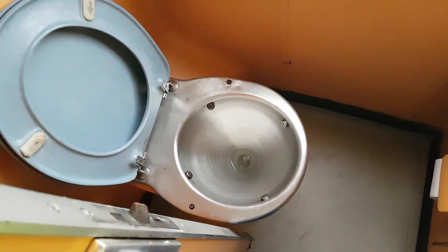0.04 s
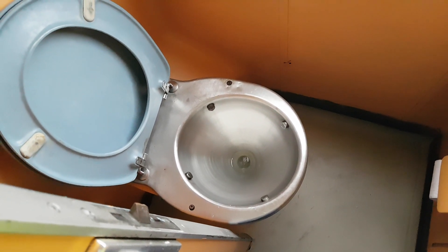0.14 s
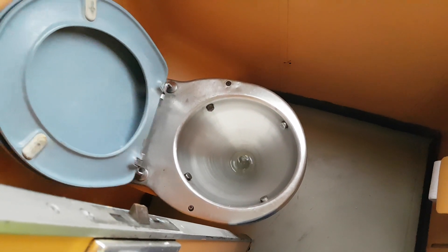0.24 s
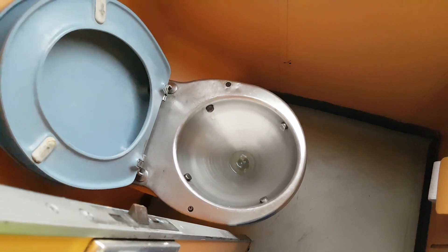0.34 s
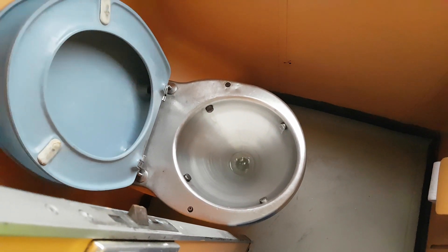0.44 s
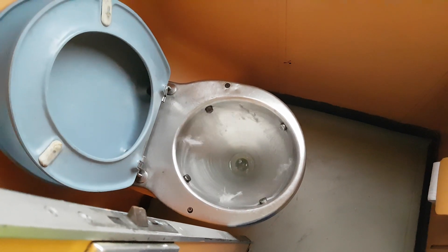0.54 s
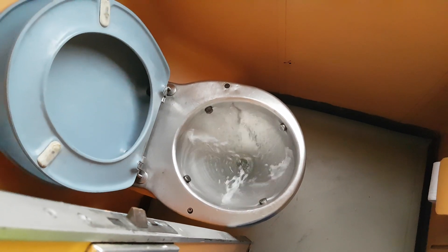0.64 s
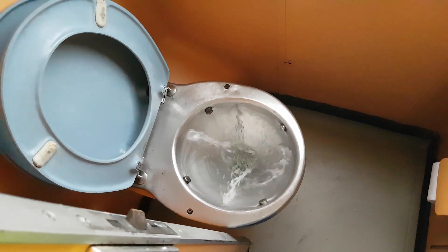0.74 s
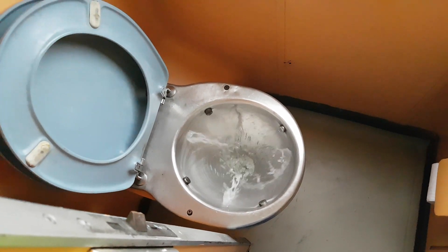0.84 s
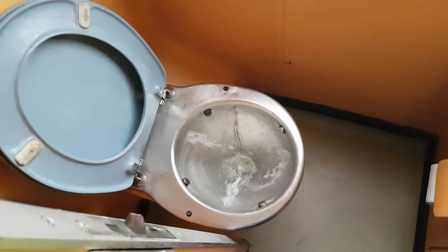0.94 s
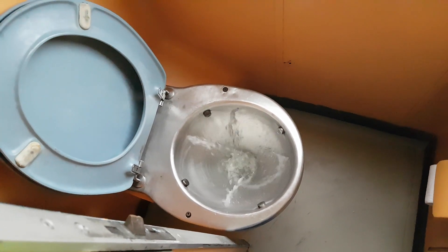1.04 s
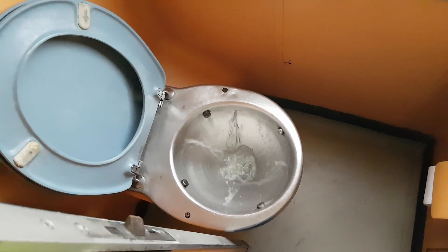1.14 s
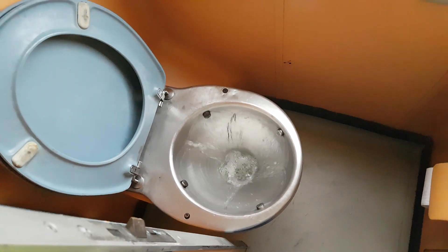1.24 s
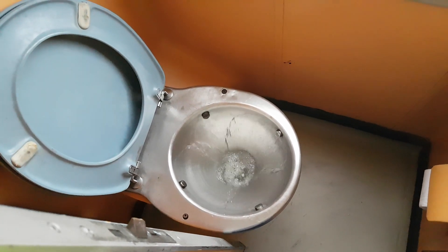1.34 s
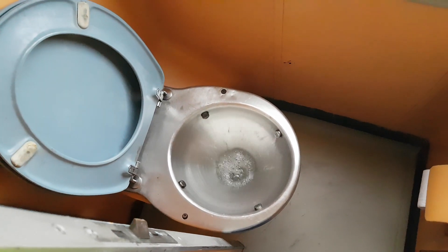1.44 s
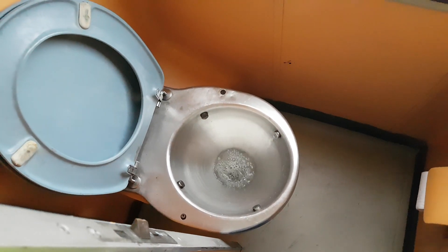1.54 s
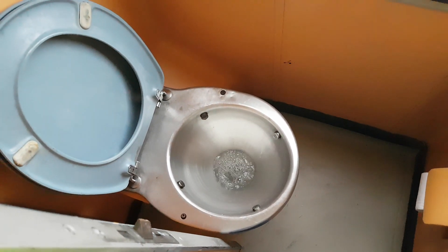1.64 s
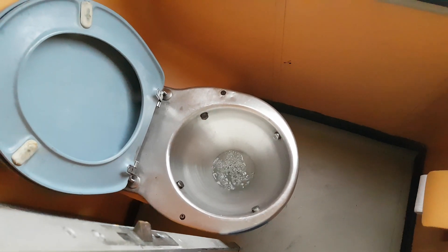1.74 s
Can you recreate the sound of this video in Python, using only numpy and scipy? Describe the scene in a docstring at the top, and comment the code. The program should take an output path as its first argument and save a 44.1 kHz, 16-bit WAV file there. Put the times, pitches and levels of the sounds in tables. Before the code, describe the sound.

Vacuum toilet flush in a small train washroom, with loud suction bursts, bowl knocks and hissing water jets

```python
"""In the small washroom of a train carriage, a vacuum toilet flushes over a steady ventilation hiss.
An air valve spits, then slugs of air and water rattle the drain pipe, knock the bowl and clack the flap.
Rinse jets spray the steel bowl and die away while the drain gulps and rumbles.
Air and spray are filtered noise with water drops as random clicks; knocks and the big gulp are sine waves.
Hard walls add a short echo tail, and two microphones hear it in stereo."""
import sys
import numpy as np
from scipy import signal
from scipy.fft import rfft, irfft
from scipy.io import wavfile
from scipy.ndimage import uniform_filter1d, minimum_filter1d

SR = 44100
rng = np.random.default_rng(int(sys.argv[2]) if len(sys.argv) > 2 else 0)


def wav_out(sig):
    """Save sig, one row per channel (or a flat mono array), as 16-bit PCM at SR to the path in sys.argv[1]."""
    wavfile.write(sys.argv[1], SR, np.round(np.clip(np.atleast_2d(sig).T, -1, 1) * 32767).astype(np.int16))


N = 77175  # length [samples]

TIME = np.arange(N) / SR  # [s]
TAPS = 8192  # filter length [samples]
HZ = np.fft.rfftfreq(TAPS, 1 / SR)  # frequencies at which filters are drawn


def amp(db):
    """Turns decibels into a plain multiplier."""
    return 10 ** (np.asarray(db) / 20)


def evened(x):
    """Scales a signal to an average strength (rms) of 1."""
    return x / np.sqrt(np.mean(x ** 2) + 1e-20)


def read(points, hz=HZ):
    """Reads between the points of a frequency table, on a log-frequency axis."""
    table_hz, value = np.transpose(points)
    return np.interp(np.log(hz + 1), np.log(table_hz + 1), value)


def rings(table):
    """Gain of resonances: each lifts the power around its frequency above a flat base."""
    lifts = sum((amp(db) ** 2 - 1) / (1 + (2 * (HZ - hz) / width) ** 2) for hz, width, db in table)
    return np.sqrt(1 + lifts.clip(-.5))


def unit(gain):
    """Scales a filter so that white noise keeps its level."""
    return gain / np.sqrt(np.mean(gain ** 2))


def colour(x, gain):
    """Gives a sound the wanted gain at each frequency, with no ringing before the sound."""
    cepstrum = irfft(np.log(np.maximum(gain, 1e-5)))
    # folding the second half onto the first makes the filter respond as early as it can
    cepstrum[1:TAPS // 2] *= 2
    cepstrum[TAPS // 2 + 1:] = 0
    response = irfft(np.exp(rfft(cepstrum)))
    return signal.fftconvolve(x, np.atleast_2d(response), axes=1)[:, :N]


def lean(x, table):
    """Tips each frequency to the left or right by making one side louder and the other softer."""
    db = read(table, np.fft.rfftfreq(2 * N, 1 / SR))
    return irfft(rfft(x, 2 * N) * amp([db / 2, -db / 2]))[:, :N]


# how alike the two channels are: (frequency [Hz], left-right correlation [-1 to 1])
CHANNEL_LIKENESS = [(30, .99), (130, 0.89), (300, 0.91), (550, 0.79), (1000, 0.44), (2000, 0.25),
                    (4000, 0.1), (12000, 0.051)]


def pair(x):
    """Blends two unrelated signals so that the bass is alike in both channels and the treble is not."""
    a, b = rfft(x)
    same = np.clip(read(CHANNEL_LIKENESS, np.fft.rfftfreq(N, 1 / SR)), -1, 1)
    mid = a * np.sqrt((1 + same) / 2)
    side = b * np.sqrt((1 - same) / 2)
    return irfft([mid + side, mid - side], N)


def air():
    """Turbulent air as stereo white noise."""
    return pair(rng.standard_normal((2, N)))


def wet(rate, spread_db, share):
    """Air mixed with water hits: random clicks of uneven size, 'rate' per second on average."""
    size = amp(spread_db * np.minimum(rng.exponential(1, N), 4))
    size = size * (rng.random(N) < rate / SR)
    hits = evened(pair(size * rng.choice([-1., 1.], (2, N))))
    share = np.clip(share, 0, 1)  # part of the power that is hits
    return np.sqrt(share) * hits + np.sqrt(1 - share) * air()


def flutter(rate_hz, depth_db):
    """Random wavering around 1: noise slower than about rate_hz, with an rms swing of depth_db."""
    slow = rfft(rng.standard_normal(N)) / (1 + (np.fft.rfftfreq(N, 1 / SR) / rate_hz) ** 4)
    return amp(depth_db * evened(irfft(slow, N)))


def burst(start, attack, hold, t60):
    """Loudness shape: straight rise, hold, then a fade that drops 60 dB in t60 seconds."""
    t = TIME - start
    fade = np.exp(-np.log(1000) * np.maximum(t - attack - hold, 0) / t60)
    return np.clip(t / attack, 0, 1) * fade


# balance of the carriage hiss: (frequency [Hz], relative level per Hz [dB])
CARRIAGE_TONE = [(25, 2.5), (45, -12), (100, -31), (200, -16.5), (450, -8.5), (700, -8), (950, -2.5),
                 (1400, -17.5), (2000, -6.5), (2700, -14), (3700, -9.5), (4400, -16), (5400, -9.5),
                 (6500, -26), (7600, -16), (9100, -31), (10500, -27.5), (13000, -23.5), (15500, -23)]
# faint resonances in the hiss: (frequency [Hz], width [Hz], lift [dB])
CARRIAGE_RINGS = [(870, 100, 2), (1135, 40, 11.5), (1550, 49, 10), (1960, 61, 6.5)]


def carriage():
    """Steady ventilation hiss: filtered noise with a few faint resonances."""
    level_db = -46
    return amp(level_db) * colour(air(), unit(amp(read(CARRIAGE_TONE)) * rings(CARRIAGE_RINGS)))


# churning of the drain: (time [s], level [dB])
RUMBLE_LEVEL = [(.17, -64), (.24, -43), (.258, -22.5), (.35, -34), (.5, -41.5), (.85, -72), (.94, -46),
                (1.01, -32), (1.13, -29.5), (1.17, -22), (1.23, -21), (1.28, -26.5), (1.35, -39.5),
                (1.45, -30.5), (1.55, -40), (1.75, -40.5)]
# balance of the churning: (frequency [Hz], relative level per Hz [dB])
RUMBLE_TONE = [(20, -11), (36, -11.5), (48, 0), (65, 1.5), (92, 1), (150, -2), (210, -11), (290, 0),
               (450, -12.5), (800, -19.5), (2000, -26.5), (3000, -31), (15000, -67)]
# one heave of the air column: (time [s], attack [s], hold [s], 60 dB fade [s], level [dB], frequency [Hz])
HEAVE = (1.155, .04, .055, .2, -23.5, 48)


def rumble():
    """Water churns as deep noise in the drain, and the air column heaves as a low sine at the main gulp."""
    *shape, db, hz = HEAVE
    heave = amp(db) * burst(*shape) * np.sin(2 * np.pi * hz * (TIME - shape[0]))
    level = amp(np.interp(TIME, *np.transpose(RUMBLE_LEVEL)))
    churn = colour(air() * level, unit(amp(read(RUMBLE_TONE))))
    return heave + churn


# a sharp spit, a duller rush and a late puff:
# (time [s], attack [s], hold [s], 60 dB fade [s], level [dB], extra treble [dB])
PUFFS = [(0.195, 0.0067, 0.034, 0.057, -18.5, 2.5), (0.218, 0.0076, 0.027, 0.3, -19, -8.5),
         (.412, 0.0017, 0.0043, 0.095, -34.5, -2.5)]
# balance of the escaping air: (frequency [Hz], relative level per Hz [dB])
PUFF_TONE = [(40, -12), (250, -5), (600, -0.5), (1200, -0.5), (4000, 3.5), (7400, 3), (9000, -4.5),
             (10500, 0), (12400, 2), (13200, -5), (15500, -11)]
# resonances of the valve: (frequency [Hz], width [Hz], lift [dB])
VALVE_RINGS = [(2600, 39, 5), (13000, 360, 6.5)]


def valve():
    """Compressed air spits from the valve: noise puffs, the first one the sharpest."""
    tone = unit(amp(read(PUFF_TONE)) * rings(VALVE_RINGS))
    top = 1 - 1 / (1 + (HZ / 9900) ** 8)  # the range that the extra treble acts on
    out = np.zeros((2, N))
    for *shape, db, treble_db in PUFFS:
        out += colour(air() * burst(*shape), tone * amp(db + treble_db * top))
    return out


# hisses and whistles:
# (time [s], attack [s], hold [s], 60 dB fade [s], level [dB], frequency [Hz], width [Hz])
WHISTLES = [(0.197, 0.003, 0.01, 0.071, -15.5, 12260, 450),
            (0.202, .008, 0.0072, 0.065, -19.5, 11300, 1000),
            (0.197, 0.003, 0.0051, 0.071, -24.5, 1250, 507), (.274, .005, .016, .08, -13.5, 2000, 380),
            (.274, .005, .045, .10, -20, 2480, 140), (.318, .008, .008, .10, -19, 2060, 180),
            (1.088, 0.019, 0.019, .25, -22, 12300, 3500), (1.108, .02, 0.021, 0.23, -23, 13930, 260),
            (1.129, 0.02, 0.04, .08, -24, 7160, 1100), (1.192, 0.0041, 0.0076, 0.073, -20, 1005, 120),
            (1.393, 0.015, 0.019, 0.24, -36.5, 1983, 50)]


def whistles():
    """Air in narrow gaps of the valve, drain and nozzles: a narrow noise band whistles, a wide one hisses."""
    out = np.zeros((2, N))
    for *shape, db, hz, width in WHISTLES:
        band = unit(1 / (1 + ((HZ - hz) / width * 2) ** 2))
        out += colour(air() * burst(*shape), amp(db) * band)
    return out


# slugs of air and water: (time [s], attack [s], hold [s], 60 dB fade [s], level [dB],
# extra bass [dB], extra treble [dB], nearness to the bowl [0-1])
SLUGS = [(.255, 0.0017, 0.009, 0.36, -15.5, 7.5, -13, 0.23), (.271, 0.002, 0.009, 0.2, -12.5, 2, 0.5, 0.6),
         (.311, 0.0076, 0.0085, 0.25, -12.5, 4, 5, 0), (.413, 0.0009, 0.013, 0.17, -21.5, 8, 3, 0.62),
         (.530, 0.0087, 0.0068, 0.17, -24.5, -10, -2.5, 1),
         (.993, 0.0021, 0.008, 0.19, -18.5, 11.5, -10, 1), (1.055, 0.005, 0.035, 0.33, -27, 8.5, -44, 1),
         (1.200, 0.0013, 0.012, 0.2, -18.5, 9, 5, 0.82), (1.243, 0.0017, 0.015, 0.16, -33, 14, 7.5, 0.7),
         (1.392, 0.017, 0.0069, 0.36, -28, 5, -8.5, .7), (1.640, 0.0037, 0.0062, 0.42, -37.5, -5, -13, 0.4)]
# balance of the pipe: (frequency [Hz], relative level per Hz [dB])
PIPE_TONE = [(30, -18), (100, -11.5), (210, -15.5), (300, -4.5), (450, -2.5), (700, -4.5), (1000, 0),
             (1450, -2), (2000, 1.5), (2900, -2.5), (4100, -3), (5500, -17), (7500, -31.5), (9000, -37),
             (12500, -39), (15500, -38)]
# resonances of the pipe: (frequency [Hz], width [Hz], lift [dB])
PIPE_RINGS = [(323, 25, 11), (482, 15, 8), (544, 18, 8), (1352, 18, 7), (1682, 25, 7), (1840, 35, 6),
              (1963, 20, 9), (2036, 25, 10), (2170, 20, 7), (2470, 35, 11), (2590, 25, 6), (3461, 20, 7),
              (3640, 40, 5)]
# resonances of the bowl, also used by the flap: (frequency [Hz], width [Hz], lift [dB])
BOWL_RINGS = [(352, 20, 6), (455, 30, 8), (808, 20, 10), (885, 20, 6), (1022, 40, 11), (1830, 35, 6),
              (1950, 35, 9)]


def drain():
    """Slugs of air and water rattle through the pipe: far ones ring the pipe, near ones the bowl."""
    low = 1 / (1 + (HZ / 555) ** 4)  # the range of the extra bass
    high = 1 - 1 / (1 + (HZ / 2900) ** 6)  # the range of the extra treble
    flow = wet(rate=1200, spread_db=3, share=.45) * flutter(rate_hz=100, depth_db=0.82)
    out = np.zeros((2, N))
    for k, (*shape, db, bass_db, treble_db, near) in enumerate(SLUGS):
        ringing = rings(PIPE_RINGS) ** (1 - near) * rings(BOWL_RINGS) ** near
        tone = unit(amp(read(PIPE_TONE)) * ringing)
        slug = np.roll(flow, k * TAPS, axis=1) * burst(*shape)  # shifted so that slugs differ
        out += colour(slug, tone * amp(db + bass_db * low + treble_db * high))
    return out


# hollow knocks of the bowl and its trap: (time [s], attack [s], 60 dB fade [s],
# upper mode [Hz], upper level [dB], lower level [dB])
KNOCKS = [(.256, 0.0026, 0.061, 286, -9, -23.5), (.277, 0.0097, 0.23, 323.6, -16.5, -20.5),
          (0.426, .008, 0.24, 276, -28.5, -47), (.555, 0.0093, 0.16, 266, -50, -38),
          (.722, 0.011, 0.16, 262, -42.5, -33.5), (.897, 0.0053, 0.2, 295, -37.5, -46),
          (.995, 0.0033, 0.085, 277, -23.5, -40), (1.151, .008, 0.1, 273, -28, -43),
          (1.204, 0.004, 0.48, 252, -28.5, -24.5), (1.367, 0.005, .2, 267.4, -30.5, -50),
          (1.423, 0.008, 0.24, 252, -26.5, -21.5), (1.443, 0.0056, .22, 267.2, -22.5, -46),
          (1.638, 0.013, 0.15, 264.4, -29.5, -60)]


def knocks():
    """Each knock rings two low modes of the bowl as sines whose pitch wavers as the water moves."""
    lower_hz = 117
    out = np.zeros(N)
    for start, attack, t60, upper_hz, upper_db, lower_db in KNOCKS:
        for hz, db in ((upper_hz, upper_db), (lower_hz, lower_db)):
            pitch = hz * flutter(rate_hz=27, depth_db=-0.04)
            turns = np.cumsum(pitch * (TIME > start)) / SR
            out += amp(db) * burst(start, attack, 0, t60) * np.sin(2 * np.pi * turns)
    return out


# clacks of the drain flap: (time [s], 60 dB fade [s], level [dB])
CLACKS = [(.4135, .03, -20), (.996, .03, -28), (1.202, .03, -27)]
# balance of a clack: (frequency [Hz], relative level per Hz [dB])
CLACK_TONE = [(100, 2), (500, 6), (1000, 5), (2000, 8), (4000, 9), (7000, 1), (9000, -13), (12500, -15),
              (15500, -15)]


def flap():
    """Sharp clacks of the drain flap: short noise bursts coloured by the bowl's resonances."""
    blows = sum(amp(db) * burst(start, 0.0014, .001, t60) for start, t60, db in CLACKS)
    return colour(air() * blows, unit(amp(read(CLACK_TONE)) * rings(BOWL_RINGS)))


# strength of the rinse jets: (time [s], level [dB])
RINSE_LEVEL = [(.522, -56), (.544, -27.5), (.575, -32.5), (.63, -28), (.72, -26.5), (.85, -26),
               (.95, -21.5), (1.08, -21.5), (1.17, -19.5), (1.215, -27), (1.29, -27), (1.37, -30.5),
               (1.425, -39.5), (1.48, -51.5), (1.75, -56.5)]
# balance of the spray: (frequency [Hz], relative level per Hz [dB])
SPRAY_TONE = [(100, -8), (600, -10.5), (1200, -7), (1900, 1), (2600, -1.5), (3150, -2.5), (4500, 2.5),
              (5700, 2.5), (7600, -2), (8900, -9), (11000, -4), (13500, -5.5), (15500, -6)]
# side of the spray: (frequency [Hz], left minus right [dB])
SPRAY_LEAN = [(500, -2.5), (1000, 2.5), (2000, -3), (3300, -1), (9000, -1.5)]


def rinse():
    """Jets spray the steel bowl: air noise mixed with many small drop hits, wavering in strength."""
    flow = wet(rate=5000, spread_db=2, share=0.34) * flutter(rate_hz=67, depth_db=1.0)
    pressure = amp(np.interp(TIME, *np.transpose(RINSE_LEVEL)))
    pressure = pressure * (TIME > RINSE_LEVEL[0][0])  # silent until the jets open
    return lean(colour(flow * pressure, unit(amp(read(SPRAY_TONE)))), SPRAY_LEAN)


def washroom(x):
    """Close hard walls add a short tail of random echoes, mostly above 450 Hz."""
    t60, tail_db = .15, -5.5  # echo fade [s], tail level [dB]
    echoes = rng.standard_normal((2, N)) * (rng.random((2, N)) < 2500 / SR)  # about 2500 per second
    echoes = pair(echoes) * burst(0.0014, 0.00067, 0, t60)
    echoes = signal.sosfilt(signal.butter(2, 450, "high", fs=SR, output="sos"), echoes)
    tail = signal.fftconvolve(x, echoes / np.linalg.norm(echoes[0]), axes=1)[:, :N]
    return (x + amp(tail_db) * tail) / np.sqrt(1 + amp(tail_db) ** 2)


def scene():
    """The flush and carriage hiss get the room's tail; the low knocks and rumble are added without it."""
    echoing = washroom(valve() + drain() + flap() + rinse() + whistles() + carriage())
    return echoing + knocks() + rumble()


# difference between the two microphones: (frequency [Hz], left minus right [dB])
MICROPHONE_LEAN = [(40, 5.5), (130, -3), (280, 0), (600, -1), (1000, -3), (2000, -5), (4500, -1.5),
                   (6000, 1.5), (7700, -6), (9400, 7), (11300, 0), (13000, -4), (14500, -9)]


def record(dry):
    """Two microphones of differing colour, then a peak limiter and a cut of the highest treble."""
    ceiling, edge_hz = .95, 15850  # limiter peak [full scale], treble cut [Hz]
    heard = lean(dry, MICROPHONE_LEAN)
    gain = minimum_filter1d(ceiling / np.maximum(abs(heard).max(0), ceiling), size=200)
    heard = heard * uniform_filter1d(gain, size=200)  # smoothed so the level moves gently
    low_pass = signal.firwin(511, edge_hz, window=("kaiser", 9), fs=SR)
    return signal.oaconvolve(heard, low_pass[None], "same")


dry = scene()
out = record(dry)
wav_out(out)
```